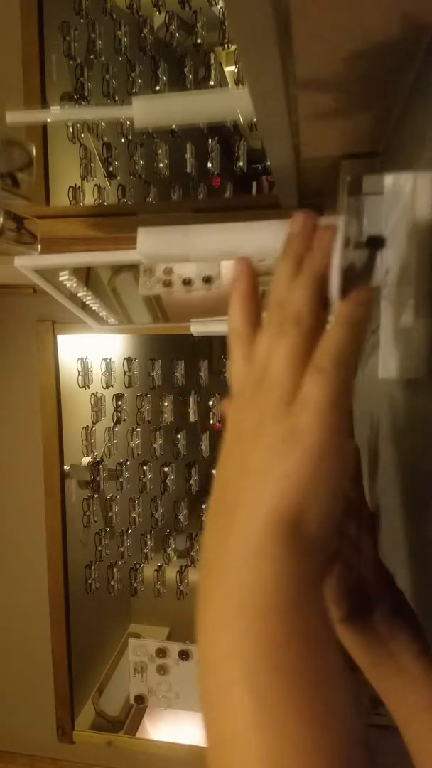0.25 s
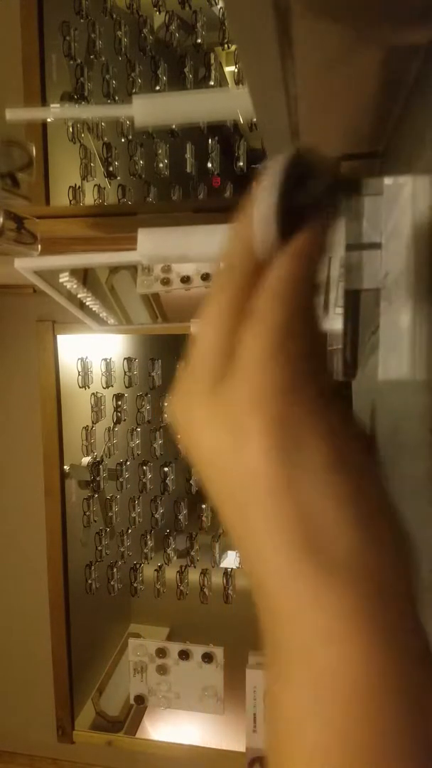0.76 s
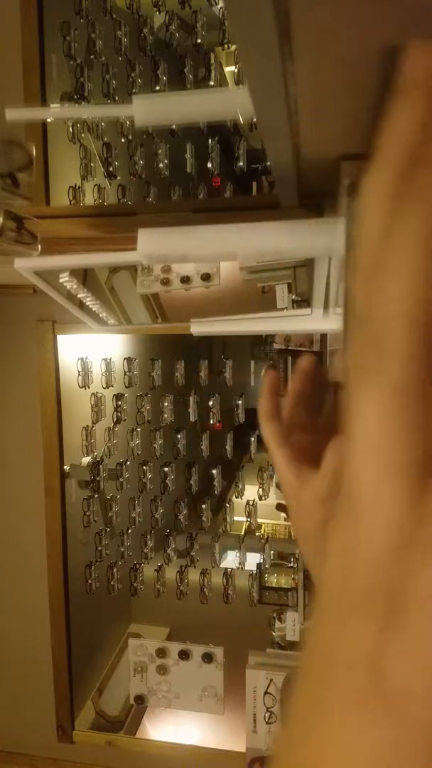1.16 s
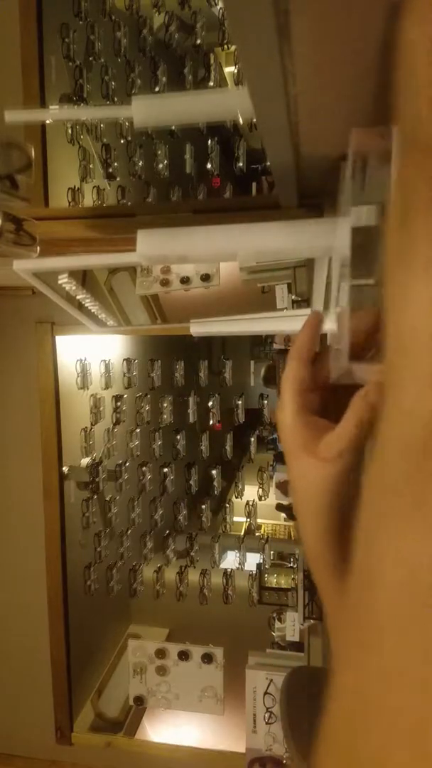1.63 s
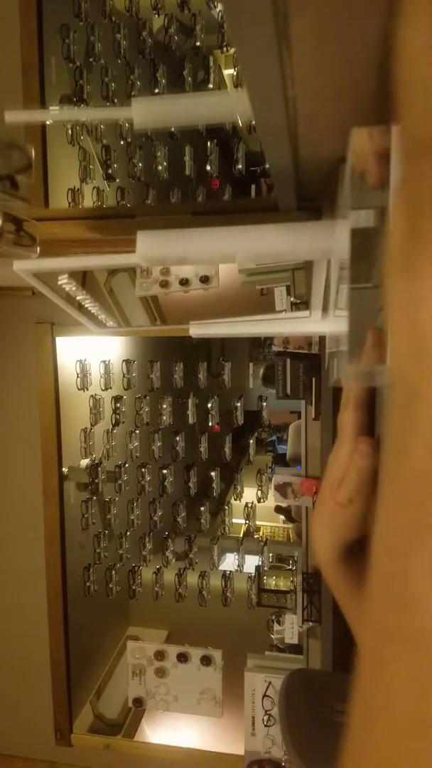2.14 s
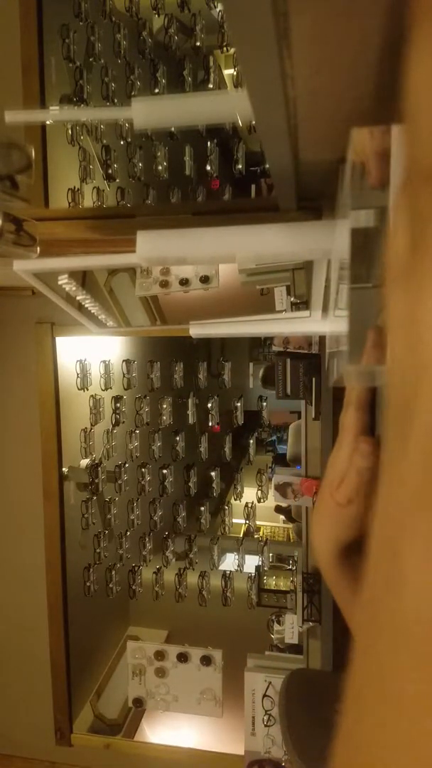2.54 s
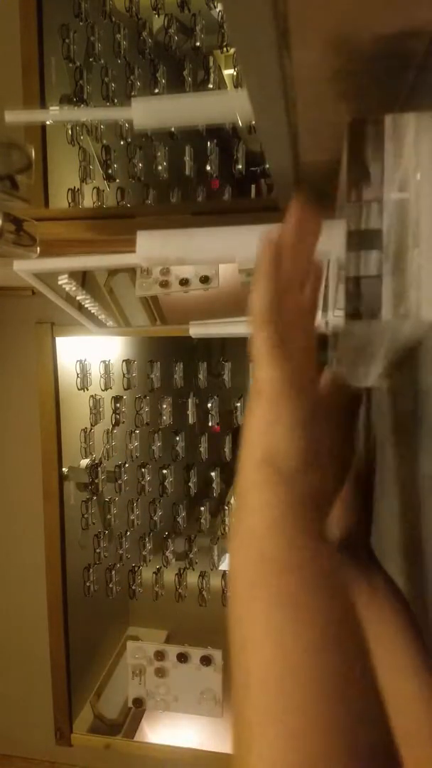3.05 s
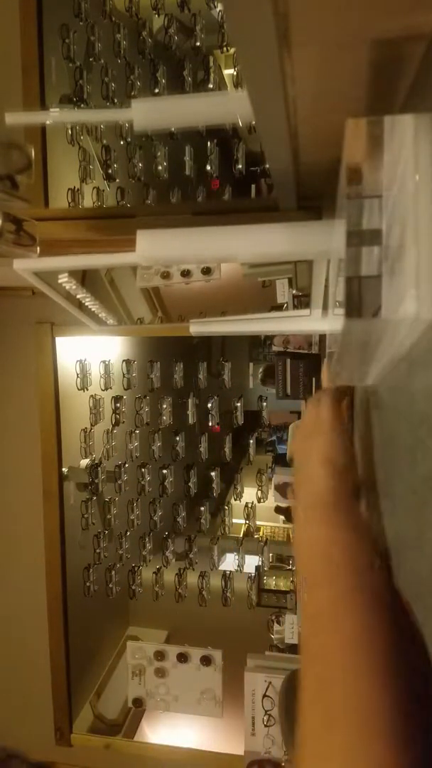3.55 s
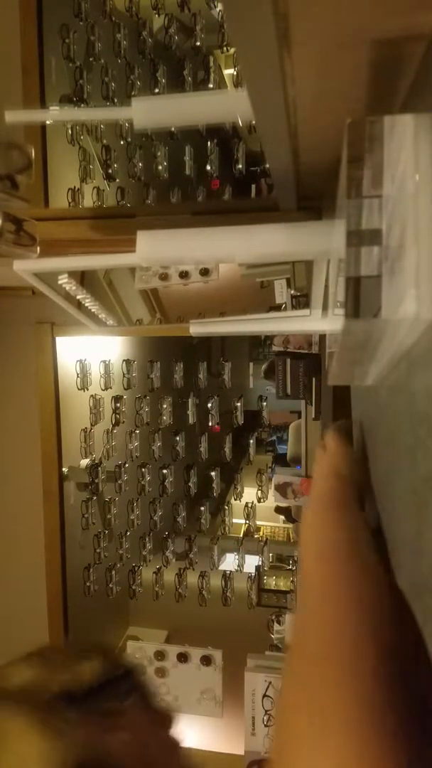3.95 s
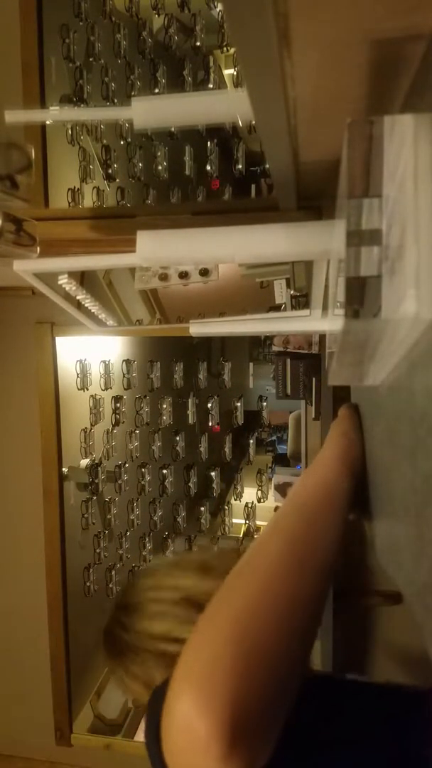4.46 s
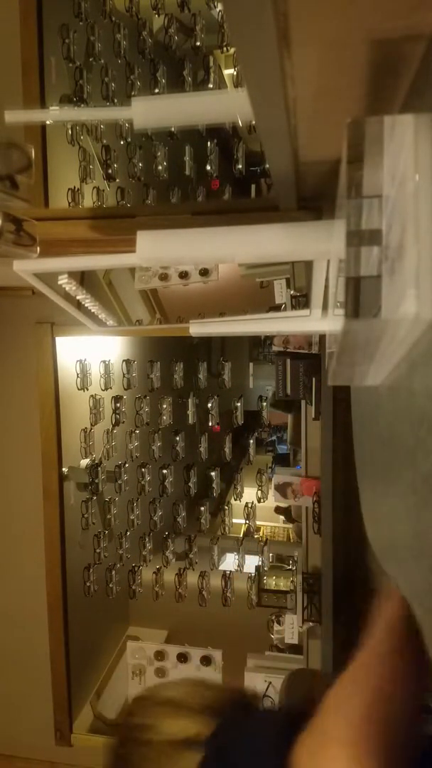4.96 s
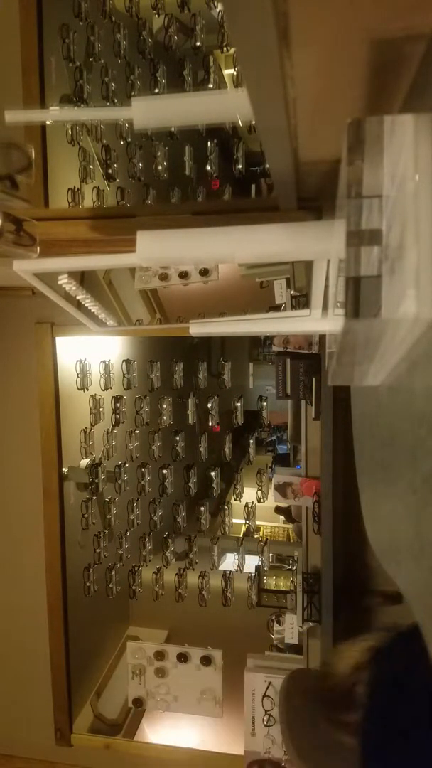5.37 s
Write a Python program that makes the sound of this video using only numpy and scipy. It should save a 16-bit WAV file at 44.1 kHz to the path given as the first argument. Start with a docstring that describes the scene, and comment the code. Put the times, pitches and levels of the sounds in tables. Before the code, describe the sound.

A toy skateboard is handled and flicked on a hard counter, very close to a two-channel phone microphone in a small shop room. Hard clacks start at once, with the loudest boxy knock at 0.16 s, smaller knocks to 0.23 s and a brief dull drag. Bright wheel clicks cluster at 0.77-1.0 s with a gritty scrape, and again at 1.1 s. Faint rubbing follows from 1.35 s, a dry tap at 1.6 s on the right, then near quiet with tiny ticks. A click at 2.6 s leads to a hard landing at 2.8 s and a sharp slap at 2.93 s, with rattles and sliding to 3.3 s. At 3.5 s the board crashes on the floor, booming and clattering. Scuffs and light bumps run to 4.6 s; dull thumps and shuffling come around 5.0-5.5 s. Low rumble, faint hum and flickering hiss continue throughout, with short room reverberation.

```python
"""Toy skateboard on a hard counter

A toy skateboard is flicked, landed and rolled close to a two-port phone microphone: noisy contacts ring modes.
Sliding is grainy filtered noise. It crashes on the floor out of sight, where the player shifts and thumps:
blows ring floor modes and shake loose parts. Noise tails make the room; a shop hum of shaped noise and sines
lies under all, and the treble flickers faintly in short puffs of hiss."""
import sys
import numpy as np
from scipy import signal
from scipy.fft import rfft, irfft
from scipy.io import wavfile
from scipy.ndimage import uniform_filter1d

SR = 44100
rng = np.random.default_rng(int(sys.argv[2]) if len(sys.argv) > 2 else 0)


def natural_amplitude(level_db):
    """Convert a level in decibels to a linear amplitude factor, elementwise."""
    exponent = np.asarray(level_db, float) / 20
    return 10 ** exponent


def generate_wav(signal):
    """Clip the signal to [-1, 1] and save it as 16-bit WAV at the path in sys.argv[1]."""
    frames = np.transpose(np.atleast_2d(signal))
    scaled = np.clip(frames, -1, 1) * 32767
    pcm = np.round(scaled).astype(np.int16)
    wavfile.write(sys.argv[1], SR, pcm)


N = 246959


def evened(x):
    """Scales to rms 1."""
    return x / np.sqrt(np.mean(x ** 2) + 1e-20)


def read(points, hz):
    """Reads a table on a log-frequency axis."""
    f, value = np.transpose(points)
    return np.interp(np.log(hz + 1), np.log(f + 1), value)


def add(mix, start_s, sound, pan_db):
    """Mixes in a sound at start_s; positive pan_db leans left."""
    part = mix[:, round(start_s * SR):][:, :sound.shape[1]]
    part += sound[:, :part.shape[1]] * natural_amplitude([[pan_db / 2], [-pan_db / 2]])


# left-right likeness of noise: f/Hz, correlation
PORT_LIKENESS = [(60, 0.92), (150, 0.98), (290, 0.93), (640, 0.31), (1400, 0.052), (15000, 0.036)]


def ports(size):
    """White noise at two ports: alike in the bass, unrelated in the treble."""
    left, other = rfft(rng.standard_normal((2, size)))
    same = np.clip(read(PORT_LIKENESS, np.fft.rfftfreq(size, 1 / SR)), -1, 1)
    right = same * left + np.sqrt(1 - same ** 2) * other
    return irfft([left, right], size)


def shaped(x, gain):
    """Colours x by a gain given as a function of frequency."""
    hz = np.fft.rfftfreq(x.shape[1], 1 / SR)
    return irfft(rfft(x) * gain(hz), x.shape[1])


def above(x, hz):
    """Small things radiate no bass: a high-pass."""
    return signal.lfilter(*signal.butter(2, hz, "high", fs=SR), x)


def unevenness(size, window):
    """Slow random wander of rms 1: noise averaged over a window of samples."""
    return evened(uniform_filter1d(rng.standard_normal(size), size=window))


def rung(push, modes, lean_db):
    """A push rings a set of modes, each dying exponentially."""
    hz, db, t60 = np.transpose(modes)[:, :, None]
    t = np.arange(round(t60.max() * SR)) / SR
    decay = natural_amplitude(db + lean_db - 60 * t / t60)
    ring = (decay * np.sin(2 * np.pi * hz * t)).sum(0)
    return signal.fftconvolve(push, ring[None], axes=1)[:, :len(t)]


# board on counter and box: t/s, knock f/Hz, peak level/dB of knock, deck, wheel click
CLACKS = [(.0095, 726, -18.5, -16, -2), (.018, 410, -20.5, -9.5, -8.5), (0.121, 900, -66, -66, -28.5),
          (.156, 1000, 0, -11, -12), (0.171, 260, -13.5, -23.5, -35), (0.211, 400, -20, -48.5, -52.5),
          (0.228, 447, -12.5, -44, -56), (0.773, 1450, -47, -13, -9), (0.8031, 1260, -29, -17, -5.5),
          (0.806, 1260, -19, -10.5, -7), (0.818, 538, -27, -21, -22), (.866, 1270, -43, -31, -33),
          (0.882, 1260, -56, -38, -25.5), (0.891, 1450, -55, -26.5, -28), (0.945, 1000, -52, -28, -26.5),
          (.993, 830, -31.5, -31, -29), (1.033, 560, -37, -35, -35.5), (1.104, 1450, -25, -11.5, -12.5),
          (1.1046, 1450, -31, -20, -6), (1.119, 1000, -23, -19.5, -17), (1.459, 845, -50, -28, -24),
          (1.6, 560, -37, -36, -32.5), (1.635, 410, -36.5, -42, -47), (1.656, 860, -49, -46, -47),
          (1.695, 864, -52, -43, -51), (1.991, 830, -38.5, -52.5, -48), (2.274, 1230, -30, -27, -30),
          (2.298, 950, -30, -39.5, -44), (2.567, 860, -49, -36.5, -32), (2.582, 860, -39, -27, -27),
          (2.591, 1450, -22.5, -21.5, -23.5), (2.605, 1230, -16, -9.5, -3.5), (2.808, 836, -6, -12, -2.5),
          (2.809, 410, -16.5, -30.5, -27.5), (2.82, 890, -15.5, -24.5, -17),
          (2.925, 915, -21, -32.5, -22.5), (2.931, 1084, -5, 0.5, -6.5), (2.944, 1230, -14, -35, -32.5),
          (2.976, 560, -20.5, -34.5, -42), (2.993, 560, -25, -12.5, -19), (3.122, 960, -16, -17, -18.5),
          (3.143, 690, -26.5, -24.5, -19), (3.174, 560, -38, -29, -29.5), (3.247, 560, -63, -45, -37.5),
          (3.277, 388, -21, -40.5, -44.5), (4.046, 1230, -43.5, -41, -31.5)]
# box modes: f/Hz, relative level/dB, t60/s
BOX_MODES = [(260, -9.5, 0.02), (410, 5, 0.028), (560, 5, 0.043), (754, -35, 0.048), (850, 8.5, 0.034),
             (1000, 12.5, 0.021), (1230, 14, 0.031), (1450, 14.5, .012)]
# deck modes: f/Hz, relative level/dB, t60/s
DECK_MODES = [(1766, 4.5, 0.0045), (2190, -5, 0.012), (2440, 4.5, 0.0058), (2930, -10, 0.01),
              (3500, -6.5, 0.0044)]
# wheel and axle spectrum: f/Hz, relative level/dB
CLICK_SPECTRUM = [(1760, -26), (3000, -6), (3990, 0), (5160, 2), (7580, -1.5), (9260, -7.5), (11700, -2),
                  (14600, -1), (16500, -26.5)]
# the harder the blow, the shorter the contact; shortest from HARD_DB up
SOFT_CONTACT_S, HARD_CONTACT_S, HARD_DB = 0.0066, 0.00099, -0.5
WHEEL_TILT = 0.148  # dB/octave per dB that wheels exceed knock
KNOCK_DELAY_S = [[0.0015], [0.00159]]  # left, right: later at the far port


def clacks():
    """A rattling contact builds for 2 ms, rings box and deck and clicks the wheels."""
    out, t = np.zeros((2, N)), np.arange(1024) / SR
    box_hz = np.transpose(BOX_MODES)[0][:, None]
    late = np.maximum(t - KNOCK_DELAY_S, 0)
    for s, knock_hz, knock_db, deck_db, click_db in CLACKS:
        hardness = min(natural_amplitude(max(knock_db, deck_db, click_db) - HARD_DB), 1)
        contact_s = SOFT_CONTACT_S + (HARD_CONTACT_S - SOFT_CONTACT_S) * hardness
        decay = np.exp(-np.maximum(t - 0.002, 0) / contact_s) + 0.12 * np.exp(-t / 0.009)
        contact = ports(1024) * np.minimum(t / 0.002, 1) ** 2 * decay
        # the struck spot favours modes near its own pitch
        near_db = -35 * np.log2(box_hz / knock_hz) ** 2
        push = late * np.exp(-2 * np.pi * knock_hz * late)
        push = push / push.max() + 0.45 * contact
        knock = above(rung(push, BOX_MODES, near_db), 0.45 * knock_hz)
        deck = above(rung(contact, DECK_MODES, 0), 1340)
        tilt_db = WHEEL_TILT * np.clip(click_db - knock_db, -20, 20)
        click = shaped(contact, lambda hz: natural_amplitude(read(CLICK_SPECTRUM, hz) + tilt_db * np.log2((hz + 1) / 7000)))
        for part, db in (knock, knock_db), (deck, deck_db), (click, click_db):
            add(out, s, natural_amplitude(db) * part / abs(part).max(), 1.5)
    return out


# dry tap beside the right port, snap and body: t/s, level/dB, settled f/Hz, left-right/dB
TAPS = [(1.6014, -15.5, 1075, -17.5), (1.602, -32, 470, -7)]


def tap():
    """Two short damped sines that sag in pitch, with no ring."""
    out, t = np.zeros((2, N)), np.arange(400) / SR
    sagging_t = t + 0.0004 * (1 - np.exp(-t / 0.0003))
    envelope = np.minimum(t / 0.0004, 1) * np.exp(-t / 0.0011)
    for s, db, hz, pan_db in TAPS:
        blip = np.sin(2 * np.pi * hz * sagging_t) * envelope
        add(out, s, natural_amplitude(db) * np.array([blip, blip]), pan_db)
    return out


# rolling, sliding, shuffling: start t/s, top t/s (may lie past end), end t/s, level/dB,
# tilt/dB from dull drag to fizz
SLIDES = [(.03, .12, 0.29, -42, -7.5), (.49, 0.57, 1.04, -60, -1.5), (.815, 0.824, 0.97, -44, -1),
          (0.863, 0.921, 0.94, -47, 3.5), (.96, 1.063, 1.17, -55, -4.5), (1.33, 1.504, 1.74, -55, -10),
          (2.15, 2.3, 2.25, -57, -5), (2.54, 2.635, 2.605, -46, -5.5), (2.82, 2.84, 3.113, -40, 0.5),
          (2.94, 2.97, 3.345, -50.5, -4.5), (3.4, 3.462, 3.47, -62, -14.5), (3.64, 3.642, 4.05, -42, -7),
          (3.81, 3.846, 3.83, -56.5, 16.5), (3.92, 3.964, 4.06, -62.5, 9), (4.045, 4.085, 4.57, -61, 5.5),
          (4.204, 4.288, 4.38, -65.5, 11.5), (4.391, 4.409, 4.49, -60.5, 8), (4.49, 4.506, 4.67, -55.5, 5),
          (4.66, 4.742, 5, -57, -4.5), (4.95, 5.086, 5.94, -59.5, -4), (5.216, 5.235, 5.32, -44, -10),
          (5.273, 5.364, 5.53, -46.5, -6.5)]
# resonances of each group: f/Hz, width/Hz
DRAG_BANDS = [(600, 390), (950, 960)]
HISS_BANDS = [(1700, 980), (2480, 210), (2600, 1800)]
FIZZ_BANDS = [(5500, 3000), (12500, 3800)]
SLIDE_RISE_DB, SLIDE_FALL_DB = 12.5, 25  # gain to the top, loss from it
HISS_DB = -2  # deck hiss against drag and fizz


def slides():
    """Grit under wheels, deck and sleeve: grainy noise in three groups of resonances."""
    t, out = np.arange(N) / SR, np.zeros((2, N))
    groups = [(-0.92, 0.0064, DRAG_BANDS, 0.5), (0, HISS_DB, HISS_BANDS, 2.5), (1, 0, FIZZ_BANDS, 2.5)]
    for lean, extra_db, bands, grit_db in groups:
        level = np.zeros(N)
        for start, top, end, db, tilt_db in SLIDES:
            edge = np.clip(np.minimum(t - start, end - t) / 0.003, 0, 1)
            # squared: round at the top
            root_db = np.interp(t, [start, top, end], np.sqrt([SLIDE_RISE_DB, 0, SLIDE_FALL_DB]))
            level += edge * natural_amplitude(db + extra_db + lean * tilt_db - root_db ** 2)
        grit = natural_amplitude(grit_db * unevenness(N, 120))
        pressure = natural_amplitude(1.6 * unevenness(N, 1500))
        rub = shaped(ports(N) * grit * pressure,
                     lambda hz: sum(np.exp(-((hz - f) / width) ** 2) for f, width in bands))
        out += level * evened(rub)
    return out


# rubbing in one band, narrow or broad: start t/s, end t/s, f/Hz, width/Hz, level/dB
RUBS = [(0.032, 0.158, 1150, 348, -43.5), (1.356, 1.606, 358, 101, -49.5), (0.866, 0.956, 2400, 940, -35),
        (1.346, 1.593, 2330, 200, -57.5), (1.364, 1.58, 850, 250, -46.5), (1.61, 1.738, 1870, 800, -71),
        (3.852, 4.65, 2520, 220, -60.5), (4.78, 4.88, 1770, 220, -57.5), (5.332, 5.538, 1530, 132.3, -53.5)]


def rubs():
    """Rubbing in one band: uneven hiss that comes and goes while board and player slide."""
    out = np.zeros((2, N))
    for start, end, centre_hz, width_hz, db in RUBS:
        size = round((end - start) * SR) // 2 * 2
        band = shaped(ports(size), lambda hz: np.exp(-((hz - centre_hz) / width_hz) ** 2))
        band = evened(band * natural_amplitude(4.2 * unevenness(size, 600)))
        add(out, start, natural_amplitude(db) * band * signal.windows.tukey(size, 0.6), 0)
    return out


# blows on the floor: t/s, relative level/dB, brightness f/Hz, decay/s, left-right/dB
THUDS = [(3.495, -21.5, 1370, 0.059, -2.5), (3.625, -34.5, 427, 0.0025, -28.5), (3.668, -35, 270, 0.04, -2),
         (3.838, -42, 210, .01, -3), (3.928, -39, 246, 0.0044, -1), (3.997, -41, 240, 0.006, -0.5),
         (4.063, -47.5, 314, 0.032, 4), (4.133, -44.5, 230, 0.033, -2), (4.405, -47.5, 225, 0.012, 2),
         (5.007, -43.5, 176.7, 0.03, -9), (5.1, -49, 194, 0.011, -1.5), (5.152, -48.5, 240., 0.0034, 1),
         (5.21, -20.5, 231.5, 0.0098, -3), (5.222, -29, 260., 0.0075, -11), (5.253, -25, 190., 0.0031, -1)]
# floor modes: f/Hz, relative level/dB, t60/s
FLOOR_MODES = [(84, 15, 0.95), (116.7, 7, 0.29), (168, -0.5, 0.32), (190, -11, 0.4), (260, 4.5, 0.029),
               (345, -14, 0.21), (440, 4, 0.045), (548.7, -6, 0.06)]
# brighter blows shake more loose parts
CLATTER_DB, CLATTER_DB_PER_OCTAVE, DULL_HZ = -29.5, 11.5, 240


def thuds():
    """A dull blow booms in the floor boards; its shudder and loose parts make a separate clatter."""
    boom, clatter, t = np.zeros((2, N)), np.zeros((2, N)), np.arange(8192) / SR
    floor_hz = np.transpose(FLOOR_MODES)[0][:, None]
    for s, db, bright_hz, decay_s, pan_db in THUDS:
        clatter_db = CLATTER_DB + CLATTER_DB_PER_OCTAVE * np.log2(bright_hz / DULL_HZ)
        burst = ports(8192) * np.minimum(t / 0.0014, 1) * np.exp(-t / decay_s)
        shudder = signal.lfilter(*signal.butter(3, bright_hz, fs=SR), burst)
        shudder = above(shudder, 0.31 * bright_hz + 60)
        loose = above(signal.lfilter(*signal.butter(1, 4500, fs=SR), burst), 1900)
        # the deck rings along
        loose = shaped(loose, lambda hz: 1 + 2.3 * np.exp(-((hz - 2250) / 500) ** 2))
        add(clatter, s, natural_amplitude(db) * shudder / shudder[:, :1024].std(), pan_db)
        add(clatter, s, natural_amplitude(db + clatter_db) * loose / loose[:, :1024].std(), pan_db)
        # a softer blow presses longer
        blow = t * np.exp(-2 * np.pi * bright_hz * t)
        push = blow / blow.max() + 4.2 * shudder / abs(shudder).max()
        # hard light blows miss the lowest modes
        lean_db = -5 * np.log2(floor_hz / min(1.76 * bright_hz, 420)) ** 2
        ring = above(rung(push, FLOOR_MODES, lean_db), 47)
        # bass wraps round the phone: little pan
        add(boom, s, natural_amplitude(db - 1) * ring / ring[:, :4096].std(), 0.1 * pan_db)
    return boom, clatter


# room decay: f/Hz, t60/s
ROOM_DECAY = [(100, 0.41), (500, 0.36), (2000, 0.39), (6000, 0.25), (15000, 0.16)]


def room(x):
    """Dense tails, each band with its own decay; three random tails crossfade, so the reverberation varies."""
    out, turn = 0, np.arange(N) / SR / 0.45
    for k in range(3):
        hz, t, noise = signal.stft(ports(SR), SR, nperseg=256)
        decay = natural_amplitude(-60 * t / read(ROOM_DECAY, hz)[:, None])
        tail = signal.istft(noise * decay, SR, nperseg=256)[1]
        # walls answer after a few ms
        tail = tail * np.clip((np.arange(tail.shape[1]) / SR - 0.006) / 0.0027, 0, 1)
        tail = tail / np.linalg.norm(tail[0])
        share = np.sqrt(2 / 3) * np.cos(np.pi * (turn + k / 3))
        out = out + signal.fftconvolve((x.mean(0) * share)[None], tail, axes=1)[:, :N]
    return out


# low rumble: t/s, relative level/dB
RUMBLE_LEVEL = [(0, -42), (.3, -51), (1.1, -44), (1.3, -62), (1.6, -50), (2.7, -46), (2.9, -53.5),
                (3.37, -53), (3.8, -40), (4.26, -40.5), (4.98, -45), (5.1, -31), (5.2, -31), (5.45, -36.5),
                (5.6, -43)]
# air noise spectrum: f/Hz, relative density/dB per Hz
AIR_SPECTRUM = [(20, -25.5), (60, -5), (140, -0.5), (220, -7.5), (350, -20), (520, -20), (800, -32.5),
                (1600, -34.5), (2400, -33.5), (3500, -42), (7000, -47.5), (14800, -44.5), (16500, -51.5)]
# thin tones: f/Hz, rms level/dB
HUM_TONES = [(339, -65.5), (458, -64.5), (517, -64), (720, -73)]


def shop():
    """Air and machines: a rumble that swells and dips, a steadier hiss above it and a few thin tones."""
    t = np.arange(N) / SR
    air = evened(shaped(ports(N), lambda hz: natural_amplitude(read(AIR_SPECTRUM, hz))))
    low = shaped(air, lambda hz: 1 / (1 + (hz / 190) ** 4))
    swell_db = np.interp(t, *np.transpose(RUMBLE_LEVEL))
    hiss_db = -47 + 0.4 * (swell_db + 51.5)
    tones = sum(natural_amplitude(db) * np.sqrt(2) * np.sin(2 * np.pi * (hz * t + rng.random())) for hz, db in HUM_TONES)
    return natural_amplitude(swell_db) * low + natural_amplitude(hiss_db) * (air - low) + tones


# puff spectrum: f/Hz, relative level/dB
FLICKER_SPECTRUM = [(1500, -55), (4000, -3.5), (6500, -10), (9000, 2), (11500, -8.5), (14800, -1.5),
                    (16500, -20.5)]
# strongest puffs: t/s, peak level/dB
FLICKER_LEVEL = [(0, -41.5), (3.5, -45.5), (3.8, -37), (5.6, -35)]
FLICKER_PER_S, FLICKER_JITTER_S = 30, 0.0154  # jitter is +/-
FLICKER_SPREAD_DB = 4  # mean drop below the strongest


def flickers():
    """The treble flickers: Hann puffs of hiss, 2.9 ms end to end, of uneven strength in a loose rhythm."""
    out, beats = np.zeros((2, N)), np.arange(0.02, N / SR, 1 / FLICKER_PER_S)
    chance = rng.random((400, 2))[:len(beats)]
    times = beats + FLICKER_JITTER_S * (2 * chance[:, 0] - 1)
    strongest_db = np.interp(times, *np.transpose(FLICKER_LEVEL))
    levels_db = strongest_db + FLICKER_SPREAD_DB * np.log(chance[:, 1])
    for s, db in zip(times, levels_db):
        puff = shaped(ports(128), lambda hz: natural_amplitude(read(FLICKER_SPECTRUM, hz))) * np.hanning(128)
        add(out, max(s, 0), natural_amplitude(db) * puff / abs(puff).max(), -1.5)
    return out


def scene():
    """Near clacks are mostly dry; the floor is hidden by the counter and arrives partly by the walls."""
    boom, clatter = thuds()
    near = clacks()
    walls = room(natural_amplitude(-11.5) * near + natural_amplitude(5) * clatter)
    board = near + tap() + slides() + rubs()
    floor = boom + natural_amplitude(4.5) * clatter
    return board + floor + walls + shop() + flickers()


def roll_off(x):
    """The treble ends steeply here."""
    return signal.sosfilt(signal.butter(12, 16820, fs=SR, output="sos"), x)


def record(dry):
    """The small microphone drops the deep bass; then the band edge and clipping."""
    bass_hz, edge_hz = 60, 21000
    edged = shaped(dry, lambda hz: 1 / np.sqrt((1 + (hz / edge_hz) ** 40) * (1 + (bass_hz / (hz + 1)) ** 4)))
    mix = np.clip(edged, -1, 1)
    return roll_off(mix)


dry = scene()
out = record(dry)
generate_wav(out)
```